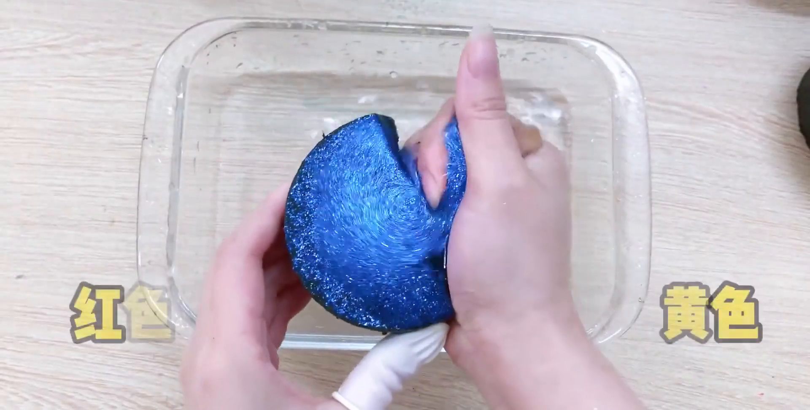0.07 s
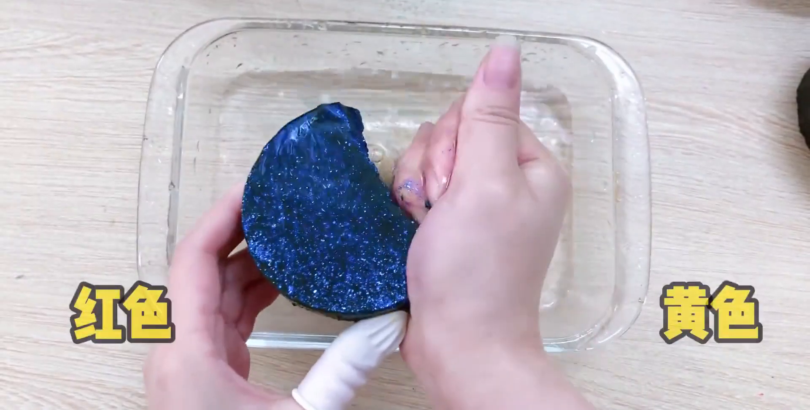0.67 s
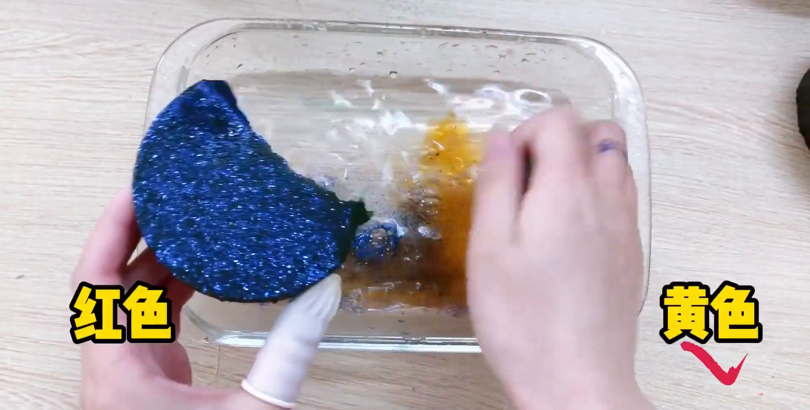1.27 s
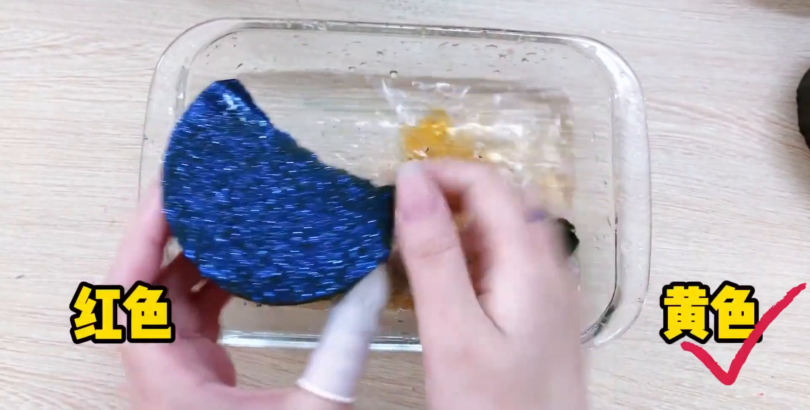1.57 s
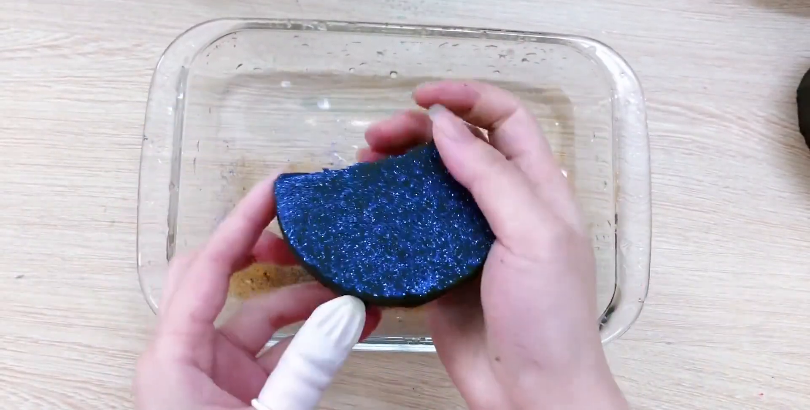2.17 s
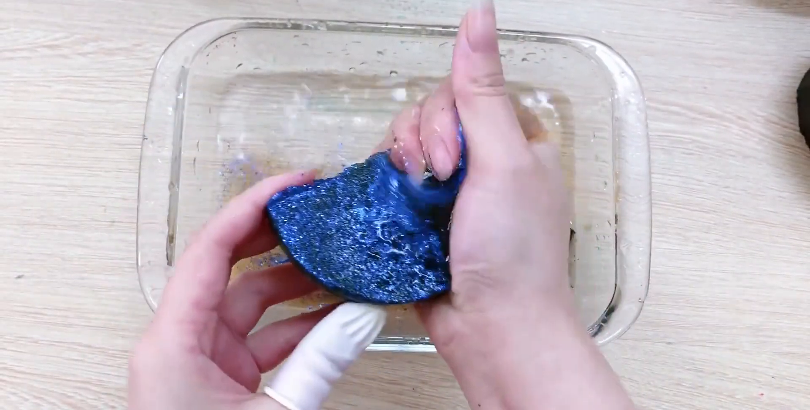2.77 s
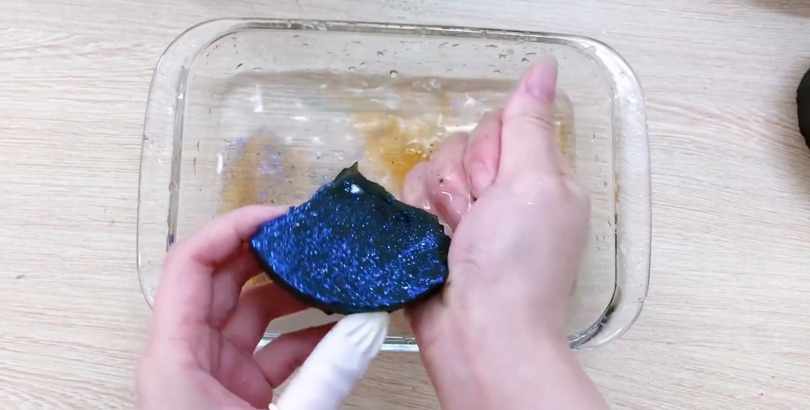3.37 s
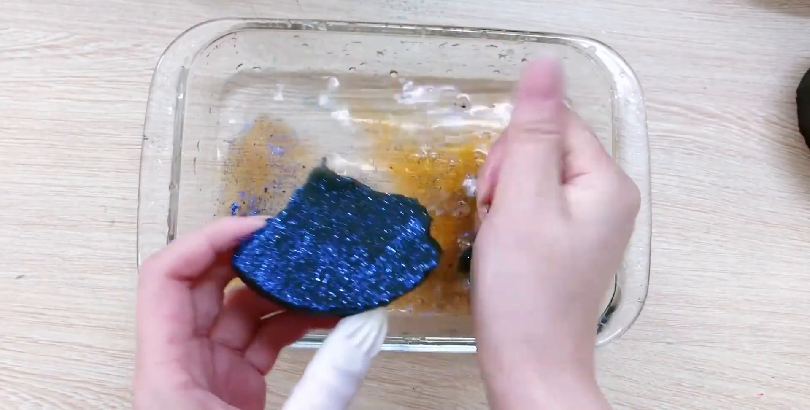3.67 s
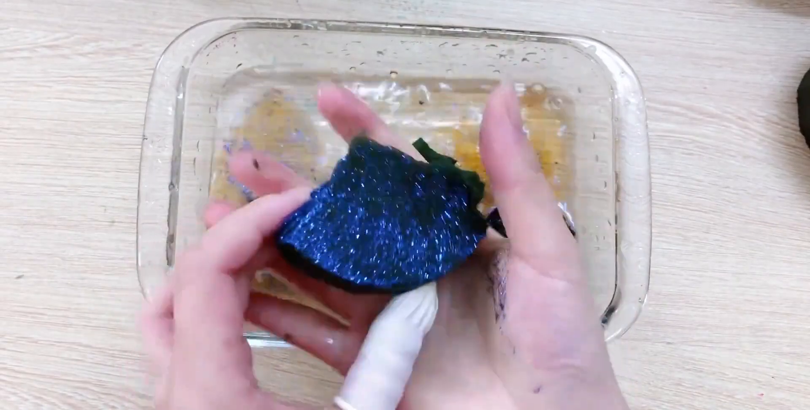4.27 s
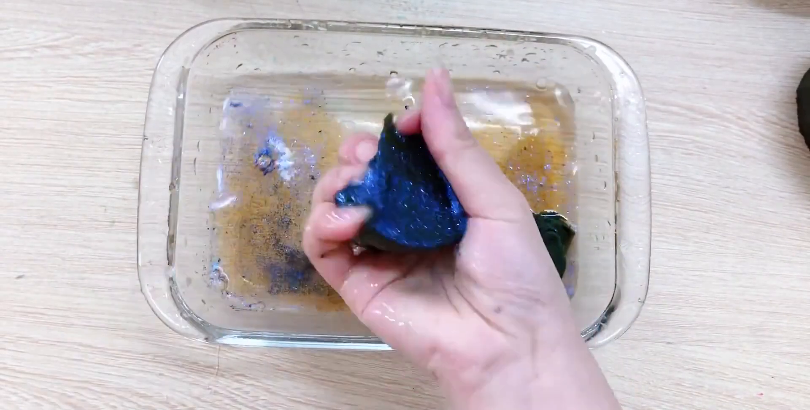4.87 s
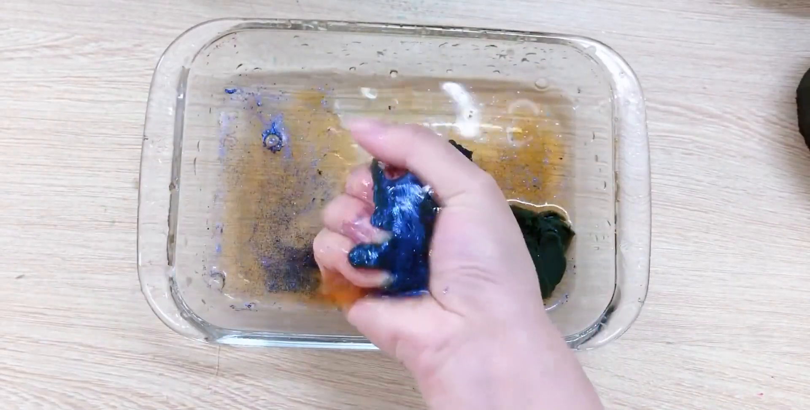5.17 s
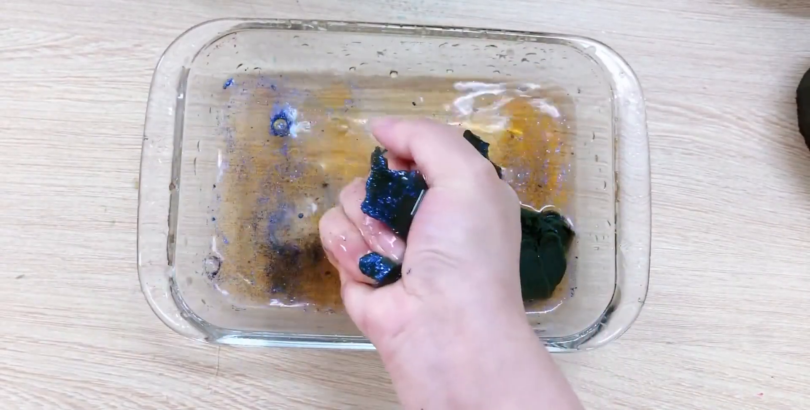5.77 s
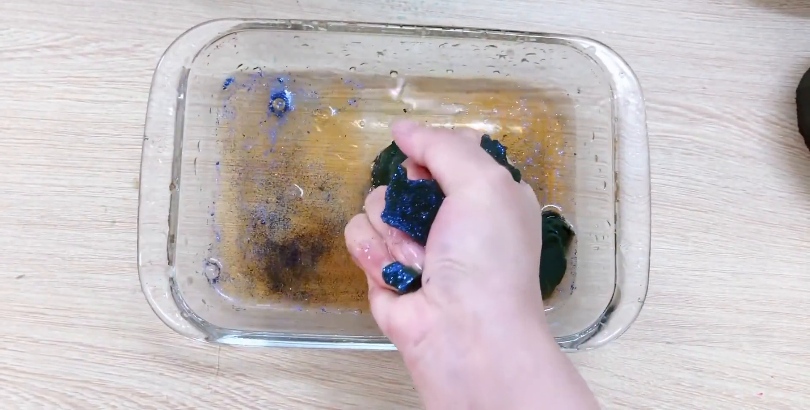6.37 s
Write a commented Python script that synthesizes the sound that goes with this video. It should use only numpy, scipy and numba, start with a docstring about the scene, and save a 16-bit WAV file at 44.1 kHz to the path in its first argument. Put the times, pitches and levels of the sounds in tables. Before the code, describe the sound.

Soaked foam is crushed by hand close to the microphone in a small room. From the start until about 1.2 seconds, a first squeeze fizzes and crackles, with a gurgle of liquid and many small bubble pops; a glass dish rings faintly along. Quiet rubbing and wet ticks follow, and a lump drops softly at about 1.6 seconds. A second squeeze begins at 2.5 seconds, with sharp, high, sputtering squirts around 2.9 and bubbles popping until about 3.7. Near 4.2 and 4.3 seconds, wet lumps hit the dish with two slaps and a dull thud. The third squeeze starts at 4.8 seconds, builds to a gurgling squelch with a sharp wet snap around 5.5, then fades into a few small pops by 6.2. Faint handling rumble, room noise and a low hum run underneath.

```python
"""Soaked foam crushed in a fist over a glass dish, close to a phone microphone in a small room.
Three squeezes: foam cells burst in a fine fizz, froth squirts through gaps that change size,
bubbles pop and wet films snap between the fingers. Between squeezes, wet lumps drop into the dish.
The glass rings along, the table reflects and the room adds a short tail.
Handling rumble, room tone and a faint hum lie underneath. Mono, alike in both channels."""
import sys
import numpy as np
from scipy import signal
from scipy.fft import rfft, irfft
from scipy.io import wavfile
from numba import njit

SR = 44100
rng = np.random.default_rng(int(sys.argv[2]) if len(sys.argv) > 2 else 0)


def persist_wave(psi):
    """Save psi, clipped to +-1, as 16-bit WAV."""
    counts = np.round(np.clip(psi, -1, 1) * 32767).astype(np.int16)
    wavfile.write(sys.argv[1], SR, np.atleast_2d(counts).T)


N = 283563
T = np.arange(N) / SR
TOP_HZ = 15700  # upper limit of the microphone
GULPS_PER_S = 140  # liquid leaves the fist unevenly

# squeezes of the fist: (grips [s], tight [s], eases [s], lets go [s], froth level [dB],
# fine cell level [dB], pressure kept after easing [dB])
SQUEEZES = [(-0.3, 0, 0.19, 1.07, -36.5, -42.5, -6.5), (2.494, 2.843, 3.18, 3.8, -32, -39, -17),
            (4.789, 5.22, 5.78, 6.05, -36, -40, -15.5)]
# the loudest bubbles: (time [s], pitch [Hz], relative level [dB], nominal ring time [s])
LOUD_BUBBLES = [(0.035, 4590, -32.5, 0.038), (0.1109, 4020, -34, 0.022), (0.1518, 1950, -26.5, 0.015),
                (0.1617, 2100, -28, 0.018), (0.1694, 4300, -27.5, 0.026), (0.2038, 7300, -19.5, 0.012),
                (0.2615, 2710, -29.5, 0.025), (0.2759, 2067, -21.5, 0.016), (0.2802, 1867, -23.5, 0.048),
                (0.3037, 1700, -30.5, 0.025), (0.3209, 1840, -24.5, 0.0092), (0.339, 9660, -24.5, 0.019),
                (0.4003, 2200, -26, 0.013), (0.4466, 8100, -32, 0.023), (0.4825, 4180, -31.5, 0.029),
                (0.5645, 2680, -29.5, 0.024), (0.5683, 4180, -25.5, 0.018), (0.575, 8000, -26, 0.0079),
                (0.5978, 9700, -31, 0.0072), (0.676, 3410, -34, 0.02), (0.729, 4000, -29.5, 0.021),
                (0.736, 5580, -18.5, 0.009), (0.742, 9330, -26.5, 0.014), (0.7644, 1990, -20, 0.017),
                (0.7774, 2930, -21.5, 0.0038), (0.801, 4300, -20.5, 0.0045), (0.8182, 7800, -28, 0.013),
                (0.9396, 1280, -31, 0.0067), (0.9546, 3280, -23.5, 0.012), (0.9542, 2430, -20.5, 0.0077),
                (1.001, 4800, -22, 0.016), (1.0403, 7650, -26, 0.0094), (1.067, 2960, -24, 0.024),
                (1.0692, 8000, -40, 0.026), (1.1129, 3360, -26, 0.026), (1.1461, 2650, -20, 0.011),
                (1.158, 2110, -26, 0.037), (1.284, 3770, -24.5, 0.035), (2.765, 5900, -22, 0.0062),
                (2.936, 3080, -16, 0.0092), (3.0499, 2480, -18, 0.014), (3.1473, 1434, -15, 0.049),
                (3.209, 5170, -20, 0.004), (3.2204, 1760, -23.5, 0.049), (3.257, 5130, -26.5, 0.056),
                (3.2684, 5070, -21, 0.0093), (3.326, 4764, -21, 0.011), (3.3258, 1623, -20, 0.066),
                (3.3446, 2720, -25, 0.024), (3.4602, 4100, -24, 0.0071), (3.518, 2200, -20, 0.0048),
                (3.531, 2378, -25.5, 0.02), (3.638, 2400, -33, 0.025), (5.1747, 2550, -24.5, 0.017),
                (5.2054, 1100, -18, 0.012), (5.2213, 2340, -22.5, 0.028), (5.2468, 3300, -25, 0.06),
                (5.2595, 3130, -18.5, 0.018), (5.2751, 3320, -20, 0.012), (5.275, 1037, -27, 0.013),
                (5.601, 2470, -20.5, 0.014), (5.74, 2970, -27.5, 0.017), (5.763, 4777, -29.5, 0.016),
                (5.859, 3420, -27, 0.013), (5.9147, 1660, -36.5, 0.026), (5.9322, 2090, -31.5, 0.019),
                (6.088, 1820, -37, 0.019)]


def amp(db):
    """Decibels to gain."""
    return 10 ** (np.asarray(db) / 20)


def unit(x):
    """Scale to rms 1."""
    return x / np.sqrt(np.mean(x ** 2))


def fade(t, t60):
    """Decay of 60 dB in t60 seconds."""
    return np.exp(-np.log(1000) * t / t60)


def add(out, s, sound):
    """Mix a sound in at time s."""
    i = max(int(s * SR), 0)
    out[i:i + len(sound)] += sound[:max(N - i, 0)]


def colour(x, points):
    """Filter by a spectrum of (frequency [Hz], gain [dB]) points."""
    hz, db = np.transpose(points)
    bin_hz = np.maximum(np.fft.rfftfreq(N, 1 / SR), 1)
    return irfft(rfft(x) * amp(np.interp(np.log(bin_hz), np.log(hz), db)), N)


def band(x, low_hz, high_hz):
    """Band-pass."""
    return signal.sosfilt(signal.butter(3, [low_hz, high_hz], "band", fs=SR, output="sos"), x)


@njit
def resonate(x, hz, q):
    """State-variable band-pass whose centre may move."""
    y, band_state, low_state = np.empty(len(x)), 0., 0.
    for i in range(len(x)):
        g = np.tan(np.pi * min(hz[i] / SR, .45))
        passed = (band_state + g * (x[i] - low_state)) / (1 + g * (g + 1 / q))
        band_state = 2 * passed - band_state
        low_state += 2 * g * passed
        y[i] = passed / q
    return y


def drift(per_s):
    """Random wander with rms 1."""
    knots = rng.standard_normal(4096)
    return unit(np.interp(T * per_s, np.arange(len(knots)), knots))


def crackle(per_s, spread_db):
    """Random tiny clicks: many weak, few strong."""
    size = amp(spread_db * np.minimum(rng.exponential(size=N), 4))
    return unit((rng.random(N) < per_s / SR) * size * rng.choice([-1, 1], N))


def swell(s, rise_s, fall_s, db, edge_db=-13.5):
    """Gain that peaks at time s and is edge_db down at rise_s before and fall_s after."""
    away = np.maximum((s - T) / rise_s, (T - s) / fall_s)
    return amp(db + edge_db * np.minimum(away, 10) ** 1.36)


def fist(grips, tight, eases, lets_go, kept_db, grip_s=0.041, release_s=0.3313, ease_s=0.2):
    """One squeeze: contact 0-1, and the pressure in dB as the fist closes and as it slackens."""
    contact = np.clip((T - grips) / grip_s, 0, 1) * np.clip(1 - (T - lets_go) / release_s, 0, 1)
    closing_db = np.interp(T, [grips, tight], [-18.5, 0])
    since = np.maximum(T - eases, 0)
    slack_db = kept_db * np.minimum(since / ease_s, 1) - 5 * since  # the hand tires by 5 dB/s
    return contact, closing_db, slack_db


def fizz_gains(gurgle_db=3.5, cell_attack_s=0.19, spent_db_per_s=7):
    """Gains of wet body, mid froth and fine cells: rubs, gushes and squeezes add up in power."""
    # fingers rub and turn the foam: (peak [s], half length [s], relative level [dB])
    rubs = [(1.55, 0.24, -53), (1.844, 0.05, -50), (2.084, 0.031, -53), (2.203, 0.032, -54),
            (3.873, 0.09, -48), (4.365, 0.32, -53), (4.55, 0.041, -50), (6.276, 0.053, -50)]
    # liquid gushes out of the fist: (peak [s], rise [s], fall [s], relative level [dB])
    gushes = [(0.03, 0.17, 0.28, -41), (0.18, 0.082, 0.1, -33.5), (2.92, 0.22, 0.092, -47.5),
              (3.23, 0.07, 0.049, -37), (5.51, 0.15, 0.13, -32.5)]
    rubbing = sum(swell(s, half_s, half_s, db) ** 2 for s, half_s, db in rubs)
    # foam resting in the hand keeps a faint floor in each band
    body = amp(-57.5) ** 2 + amp(-2) ** 2 * rubbing
    middle = amp(-63) ** 2 + rubbing
    fine = amp(-59) ** 2 + rubbing
    gulps = unit(amp(gurgle_db * drift(GULPS_PER_S)))
    body += sum((gulps * swell(*gush)) ** 2 for gush in gushes)
    for grips, tight, eases, lets_go, froth_db, cells_db, kept_db in SQUEEZES:
        contact, closing_db, slack_db = fist(grips, tight, eases, lets_go, kept_db)
        pressure_db = closing_db + slack_db
        age = np.maximum(T - grips, 0)
        # fine cells burst first and get used up
        bursting_db = -12.5 * np.maximum(1 - age / cell_attack_s, 0) - spent_db_per_s * age
        body += (contact * amp(froth_db - 10 + 0.94 * pressure_db)) ** 2
        middle += (contact * amp(froth_db + pressure_db)) ** 2
        fine += (contact * amp(cells_db + bursting_db + 0.24 * slack_db)) ** 2
    return np.sqrt([body, middle, fine])


def fizz(body_db=-1, middle_db=-2.5, fine_db=-2.0):
    """Foam cells of many sizes burst close to the microphone, each ringing for a few cycles."""
    # tone colour of the foam: (frequency [Hz], gain [dB])
    foam_spectrum = [(88, -37), (150, 14.5), (182, -6), (359, -2.5), (404, -2.5), (436, -3), (668, -11),
                     (1040, -3), (1340, -7.5), (2100, -0.5), (3100, -5), (4840, -7.5), (7560, -8.5),
                     (15500, -20.5)]
    body, middle, fine = fizz_gains()
    cells = np.zeros(N)
    for hz in np.geomspace(200, 15000, 26):
        centre_hz = hz * np.exp(0.032 * drift(60))
        ring = resonate(crackle(per_s=3200, spread_db=5.5), centre_hz, q=2.57)
        ring = resonate(ring, centre_hz, q=2.04)
        cells += unit(ring) * np.sqrt(hz)
    cells = colour(cells, foam_spectrum) * amp(2.0 * drift(30))
    body *= amp(body_db) * unit(band(cells, 165, 1290))
    middle *= amp(middle_db) * unit(band(cells, 1530, 4430))
    fine *= amp(fine_db) * unit(band(cells, 5350, 14500))
    return body + middle + fine


def squirts(ceiling=3.3, pocket_q=13.0, gurgle_db=2.0):
    """Sputtering froth rings an air pocket, whose pitch glides as it changes size."""
    # froth forced through a gap: (peak [s], rise [s], fall [s], start pitch [Hz], end pitch [Hz],
    # level [dB])
    gaps = [(0.12, 0.25, 0.16, 2110, 2100, -43), (2.61, 0.078, 0.083, 2750, 1910, -44),
            (2.85, 0.13, 0.037, 4280, 3450, -33), (2.875, 0.016, 0.0083, 6700, 8740, -10.5),
            (2.881, 0.0072, 0.0071, 9700, 11300, -24), (2.908, 0.029, 0.034, 6300, 4200, -18),
            (2.89, 0.066, 0.055, 2380, 2160, -26.5), (2.961, 0.018, 0.05, 4400, 4100, -28.5),
            (2.96, 0.028, 0.049, 2900, 2200, -27), (3.07, 0.09, 0.073, 2460, 2250, -27.5),
            (3.542, 0.015, 0.11, 2280, 2310, -49), (5.13, 0.15, 0.13, 3040, 2290, -37.5),
            (5.443, 0.04, 0.074, 2150, 1520, -22.5), (5.494, 0.016, 0.0093, 7470, 6360, -29),
            (5.494, 0.022, 0.016, 11400, 12200, -32), (5.54, 0.2, 0.2, 1130, 1150, -39.5),
            (5.539, 0.065, 0.034, 1470, 2750, -21), (5.551, 0.013, 0.013, 2970, 5000, -22),
            (5.589, 0.015, 0.039, 1800, 2070, -27.5), (5.785, 0.056, 0.08, 4960, 5030, -34.5),
            (5.79, 0.037, 0.04, 6250, 6160, -39)]
    out = np.zeros(N)
    sputter = crackle(per_s=4000, spread_db=1.2)
    waver = np.exp(.022 * drift(250))
    gulps = amp(gurgle_db * drift(GULPS_PER_S))
    for s, rise_s, fall_s, start_hz, end_hz, db in gaps:
        on = (T > s - rise_s) & (T < s + fall_s)
        pitch = np.geomspace(start_hz, end_hz, on.sum())
        ring = unit(resonate(sputter[on] * gulps[on], pitch * waver[on], pocket_q))
        # the narrow gap limits how hard the pocket can swing
        ring = resonate(ceiling * np.tanh(ring / ceiling), pitch, q=0.92)
        envelope = swell(s, rise_s, fall_s, db)[on] * signal.windows.tukey(on.sum(), .06)
        add(out, s - rise_s, unit(ring) * envelope)
    return out


def bubble(hz, t60, glide, open_cycles=1.28):
    """A cavity opens within a few cycles and rings out while its pitch bends."""
    t = T[:int(t60 * SR) + 64]
    pitch = hz * (1 + glide * (np.tanh(3 * t / t60) - .3))
    envelope = (1 - np.exp(-t * hz / open_cycles)) * fade(t, t60)
    return envelope / envelope.max() * np.sin(2 * np.pi * np.cumsum(pitch) / SR)


def pop_activity(idle_per_s=5.0, idle_db=-47, tight_per_s=230, reach_s=0.016, flurry_db=-16.5):
    """Rate and base level in dB of small pops: many in a tight fist, fewer as it slackens."""
    rate, gain = np.full(N, idle_per_s), np.full(N, amp(idle_db))
    for grips, tight, eases, lets_go, froth_db, _, kept_db in SQUEEZES:
        contact, _, slack_db = fist(grips, tight, eases, lets_go, kept_db)
        frothing = contact * (T > tight) * amp(0.5 * slack_db)
        rate += tight_per_s * frothing
        gain = np.maximum(gain, amp(froth_db) * frothing)
    # a large bubble upsets the small ones around it
    crowd = np.zeros(N)
    for s, _, db, _ in LOUD_BUBBLES:
        near = np.abs(T - s) < 2 * reach_s
        closeness = np.exp(-((T[near] - s) / reach_s) ** 2)
        crowd[near] = np.maximum(crowd[near], closeness)
        gain[near] = np.maximum(gain[near], amp(db + flurry_db) * closeness)
    return rate * (1 + 1.3 * crowd), 20 * np.log10(gain)


def small_pops(low_hz=2000, high_hz=12500, spread_db=4.5, tilt_db_per_octave=-2.0):
    """Small bubbles in the froth pop in random flurries, each a tick with a hint of pitch."""
    rate, base_db = pop_activity()
    out = np.zeros(N)
    flurry = amp(4 * drift(35))
    times = T[rng.random(N) < flurry * rate / SR]
    for s, (height, weakness, turn, ring) in zip(times, rng.random((2048, 4))):
        hz = low_hz * (high_hz / low_hz) ** height
        db = base_db[int(s * SR)] + tilt_db_per_octave * np.log2(hz / low_hz)
        db -= spread_db * np.log(.04 + weakness)
        pop = bubble(hz, t60=.002 + .005 * ring, glide=0.3 * (turn - .45), open_cycles=3.6)
        add(out, s, amp(db) * pop)
    return out


def handling(low_hz=45, high_hz=270):
    """Shifting hands send an uneven dull rumble through the table to the microphone."""
    # hands against the table: (time [s], level [dB])
    rumble_levels = [(0, -58), (1.2, -57), (1.7, -49.5), (2.2, -49.5), (3.2, -47.5), (3.6, -62),
                     (6.43, -69)]
    rumble = unit(band(rng.standard_normal(N), low_hz, high_hz))
    return rumble * amp(np.interp(T, *np.transpose(rumble_levels)) + 0.54 * drift(6.1))


def room_tone(noise_db=-45):
    """The small room's own steady rumble and hiss, with a wavering low hum."""
    # tone colour of the room noise: (frequency [Hz], gain [dB])
    room_spectrum = [(13, -43), (22, -21), (37, -6.5), (59, 4), (87, -6.5), (220, -9.5), (306, -18),
                     (625, -21.5), (737, -21), (1080, -30), (2530, -29.5), (4900, -34.5), (5620, -50),
                     (9720, -31.5), (15500, -43)]
    # tones of the hum: (frequency [Hz], level [dB])
    hum_tones = [(52.5, -55), (108, -53), (168, -59), (211, -57.5), (238, -67)]
    noise = unit(colour(rng.standard_normal(N), room_spectrum)) * amp(noise_db)
    hum = sum(np.sin(2 * np.pi * hz * T + 1.2 * drift(9.8)) * amp(db + 3.7 * drift(5))
              for hz, db in hum_tones)
    return noise + hum


def film_tick(hz, q, t60, attack_s=0.0012):
    """A film tears: a short splat of noise in one broad resonance, peak 1."""
    t = T[:SR // 20]
    noise = rng.standard_normal(len(t)) * fade(t, t60) * (1 - np.exp(-t / attack_s))
    tick = resonate(noise, np.full(len(t), float(hz)), q)
    return tick / np.abs(tick).max()


def loud_pops(ring_scale=0.72, ring_db=3.5, tear_db=-13, neighbour_db=-9):
    """A bubble tears with a tick and its cavity rings; neighbours give way just before and after."""
    out = np.zeros(N)
    for s, hz, db, ring_s in LOUD_BUBBLES:
        glide = 0.07 + 0.11 * rng.standard_normal()
        add(out, s, amp(db + ring_db) * bubble(hz, ring_s * ring_scale, glide))
        add(out, s, amp(db + tear_db) * film_tick(hz, q=1.0, t60=0.015))
        for late, height, turn in rng.uniform(-1, 1, (3, 3)):
            neighbour_hz = min(hz * 1.354 * 1.655 ** height, TOP_HZ)
            # early neighbours tend to slide down in pitch, late ones up
            neighbour = bubble(neighbour_hz, t60=0.007, glide=0.16 * late + 0.23 * turn, open_cycles=1.0)
            add(out, s + .0035 * (late + 0.296), amp(db + neighbour_db) * neighbour)
    return out


def snaps(gain_db=-3.0):
    """Thin wet films snap between skin and foam."""
    # the loudest films: (time [s], relative level [dB], centre [Hz])
    films = [(0.2364, -26, 7000), (0.3367, -20, 9600), (0.3621, -22, 5740), (0.4105, -20.5, 6470),
             (0.7756, -18, 4600), (0.818, -20.5, 7800), (0.868, -28, 7000), (0.9996, -26, 6000),
             (0.9512, -17, 4370), (1.067, -16.5, 7700), (1.393, -32, 8800), (1.568, -29, 6360),
             (1.6661, -21.5, 12500), (1.765, -31, 9200), (2.357, -36, 3350), (3.238, -13.5, 4900),
             (3.257, -21, 9000), (3.3059, -19, 8340), (3.387, -26, 11000), (3.5742, -29, 8690),
             (3.6387, -29.5, 5900), (3.7017, -25, 6600), (4.1926, -21.5, 8300), (4.211, -25.5, 4420),
             (4.2947, -22, 4140), (4.4232, -25, 5900), (5.2032, -18.5, 4636), (5.44, -14, 5600),
             (5.4986, -8, 5650), (5.5907, -20, 6920), (5.729, -17, 4800), (6.1607, -25, 5070)]
    out = np.zeros(N)
    for s, db, hz in films:
        add(out, s, amp(db + gain_db) * film_tick(hz, q=2.1, t60=0.014))
    return out


def lumps(sag=0.34, sag_s=0.0031, table_hz=160, table_db=-7):
    """A soft lump lands: a wet slap on the glass over a dull thud of dish and table."""
    # lumps landing: (time [s], slap level [dB], slap pitch [Hz], thud level [dB], thud pitch [Hz])
    landings = [(1.567, -35, 1310, -44, 129), (1.582, -56, 900, -29.5, 87), (4.2126, -15, 1090, -17.5, 112),
                (4.262, -50, 1200, -26.5, 116), (4.2973, -13, 1220, -33, 127)]
    # resonances of a wet slap: (multiple of its pitch [ratio], t60 [s], relative level [dB])
    slap_modes = [(.65, .007, -6), (1, 0.013, 9), (1.6, 0.0063, 11.5), (3, 0.0074, -3)]
    out, t = np.zeros(N), T[:SR // 4]
    for s, slap_db, slap_hz, thud_db, thud_hz in landings:
        slap = sum((-1) ** k * amp(db) * fade(t, t60) * np.sin(2 * np.pi * ratio * slap_hz * t)
                   for k, (ratio, t60, db) in enumerate(slap_modes))
        add(out, s, amp(slap_db) * slap / np.abs(slap).max())
        pitch = thud_hz * (1 + sag * np.exp(-t / sag_s))
        thud = fade(t, t60=0.22) * np.sin(2 * np.pi * np.cumsum(pitch) / SR)
        table = amp(table_db) * fade(t, t60=0.16) * np.sin(2 * np.pi * table_hz * t)
        add(out, s, amp(thud_db) * (thud + table))
    return out


def surroundings(direct, echo_s=.004, echo_db=-11, room_db=-14, room_t60=0.32):
    """The microphone hears the direct sound, the ringing dish, a table bounce and a short room tail."""
    # ring of the glass dish: (frequency [Hz], t60 [s], relative level [dB])
    dish_modes = [(980, 0.11, -8), (1234, 0.043, 6.5), (1726, 0.098, 10), (2030, 0.087, -25),
                  (2850, 0.022, 8.5), (3700, 0.026, 7), (3950, 0.063, -22), (4650, .05, -23)]
    # how strongly the sound reaches the dish: (time [s], level [dB])
    dish_coupling = [(0, -33), (.6, -8), (1.25, -10.5), (2.0, -36), (3.3, -21.5), (4.3, -55), (5, -51),
                     (6.43, -40)]
    t = T[:SR // 2]
    dish = sum(amp(db) * fade(t, t60) * np.cos(2 * np.pi * hz * t) for hz, t60, db in dish_modes)
    at_dish = direct * amp(np.interp(T, *np.transpose(dish_coupling)))
    ring = signal.fftconvolve(at_dish, dish / np.linalg.norm(dish))[:N]
    tail = band(rng.standard_normal(len(t)), 160, 14000) * fade(t, room_t60) * (1 - np.exp(-t / 0.0025))
    room = signal.fftconvolve(direct, tail / np.linalg.norm(tail))[:N]
    # the path via the table changes as the hands move
    echo = np.interp(T - echo_s * (1 + 0.1174 * drift(3)), T, direct)
    return direct + ring + amp(echo_db) * echo + amp(room_db) * room


def scene():
    """One close microphone: the foam up front, the room underneath, alike in both channels."""
    foam = fizz() + squirts() + small_pops() + loud_pops() + snaps() + lumps()
    mono = surroundings(foam) + handling() + room_tone()
    return np.array([mono, mono])


def record(dry):
    """The phone cuts the top treble steeply."""
    return signal.sosfilt(signal.ellip(10, .2, 80, TOP_HZ, fs=SR, output="sos"), dry)


dry = scene()
out = record(dry)
persist_wave(out)
```